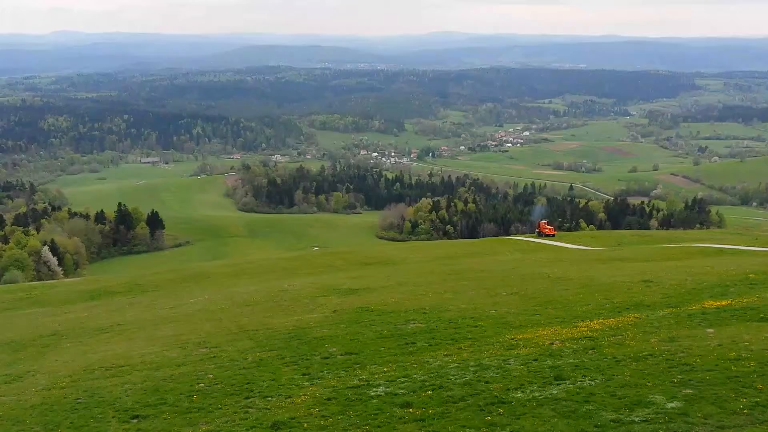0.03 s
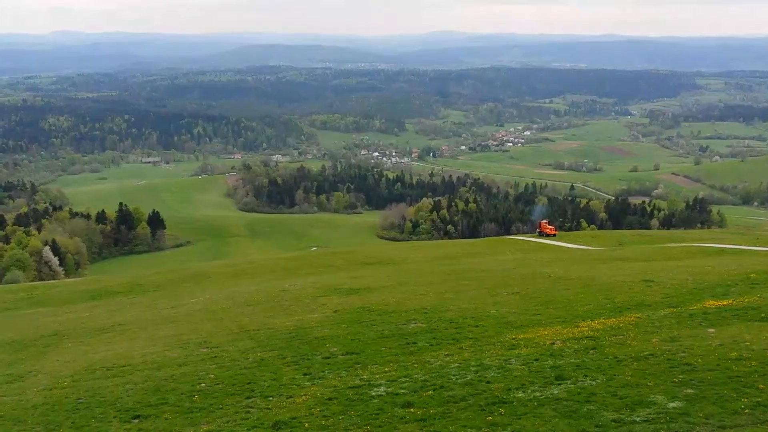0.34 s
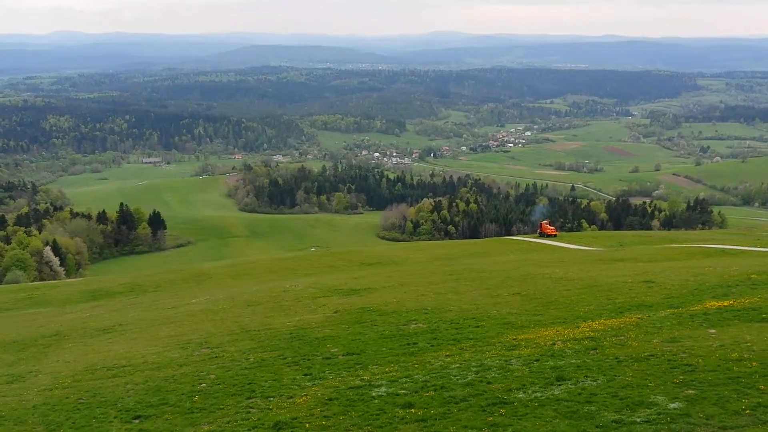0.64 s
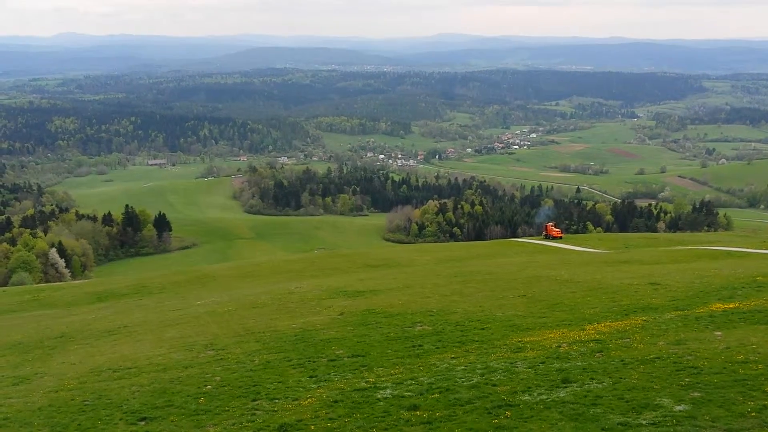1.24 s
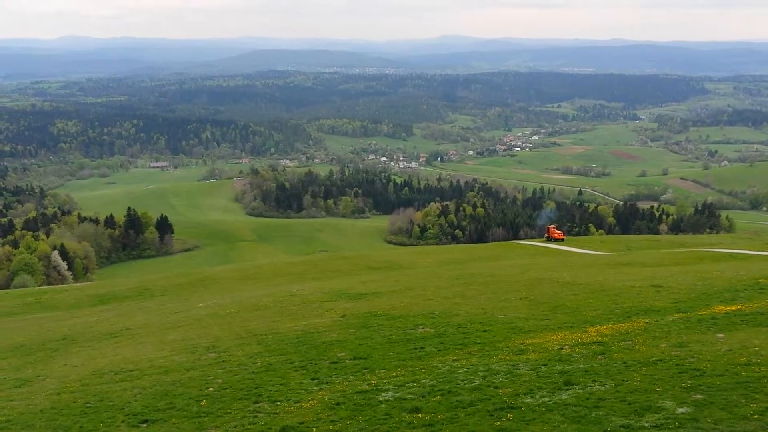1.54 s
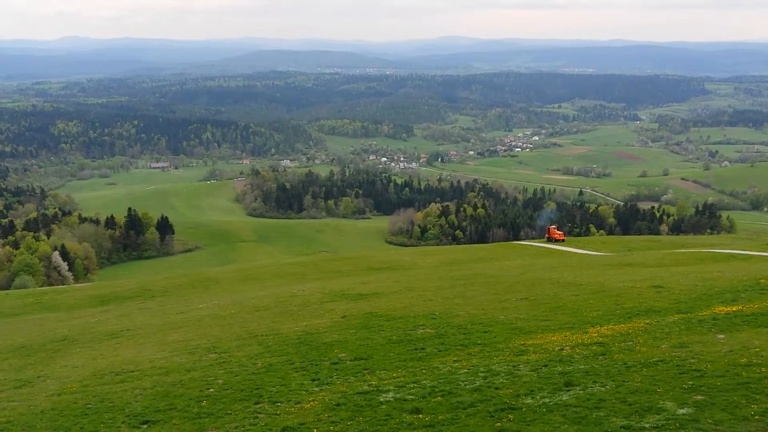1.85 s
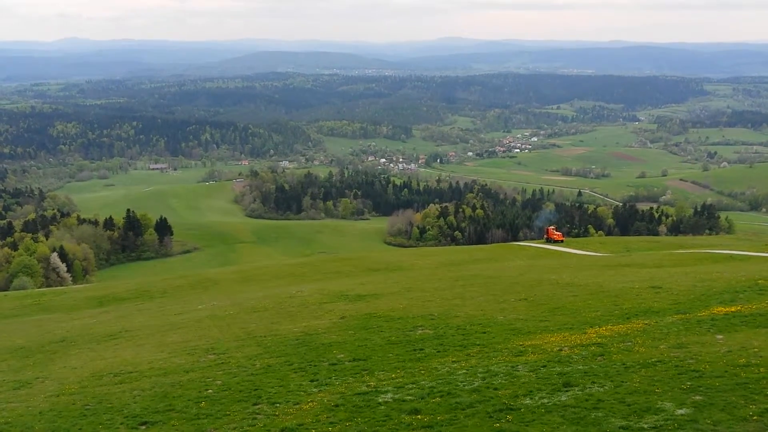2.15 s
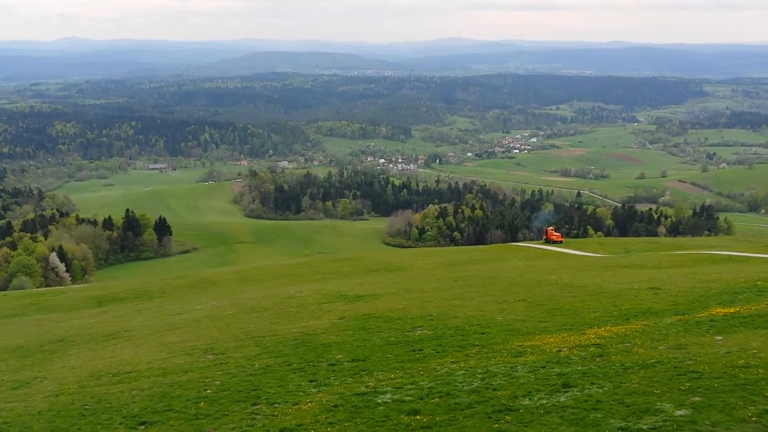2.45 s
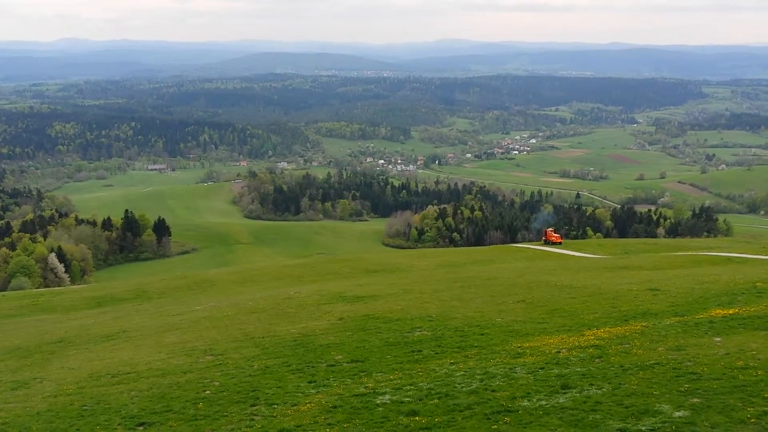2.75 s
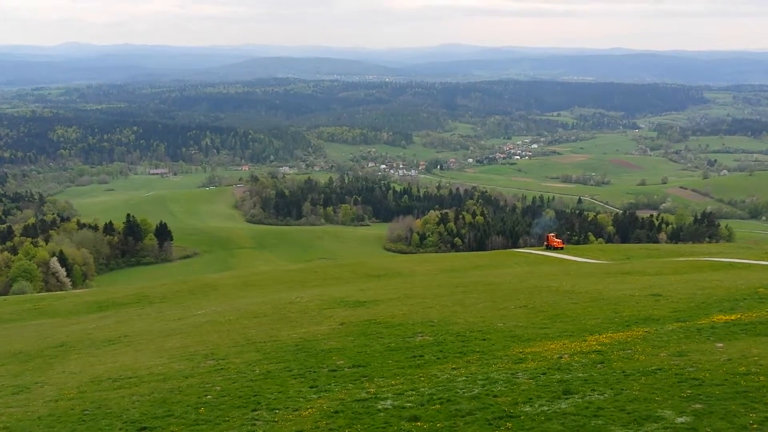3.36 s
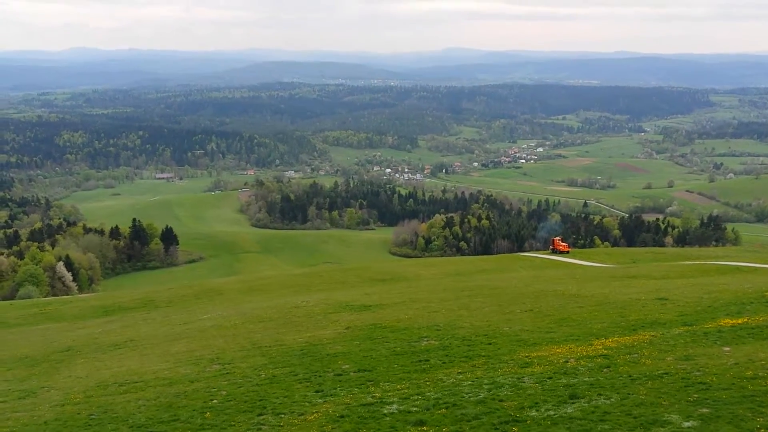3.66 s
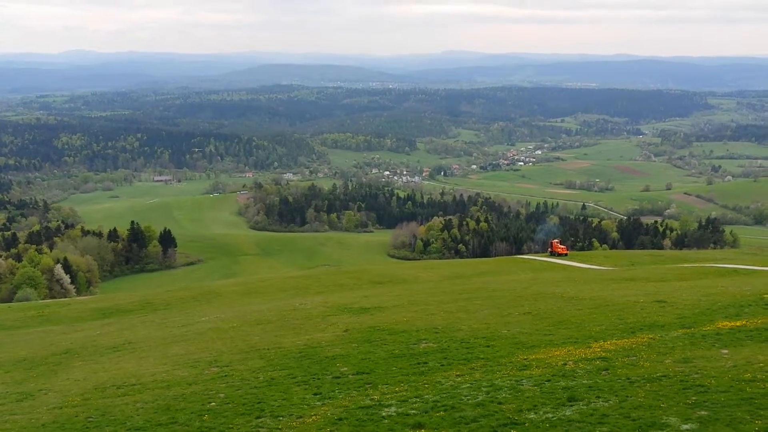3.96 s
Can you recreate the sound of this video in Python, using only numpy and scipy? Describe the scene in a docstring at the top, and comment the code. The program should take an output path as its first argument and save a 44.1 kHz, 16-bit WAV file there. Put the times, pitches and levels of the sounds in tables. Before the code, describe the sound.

A distant diesel machine, probably a winch, drones and rattles evenly across an open field, with a faint wavering whine and thin hiss. Low wind thumps hit the microphone now and then, thickening near the end.

```python
"""After a short silence, a diesel engine, probably a winch, fades in on an open hillside.
It runs at a steady speed: its knocks repeat every cycle and excite the resonances of the housing,
over a low exhaust hum, a faint gliding whine and a thin hiss. From the first second on, wind bumps
against the microphone, mostly on the right; the bumps come thickest in the last second."""
import sys
import numpy as np
from scipy import signal
from scipy.fft import rfft, irfft
from scipy.io import wavfile

SR = 44100
rng = np.random.default_rng(int(sys.argv[2]) if len(sys.argv) > 2 else 0)


def file_out(sig):
    """Save sig as 16-bit WAV at sys.argv[1]."""
    # one column per channel
    cols = np.atleast_2d(sig).T
    # limit, then scale
    lim = np.clip(cols, -1, 1)
    pcm = np.round(lim * 32767).astype(np.int16)
    wavfile.write(sys.argv[1], SR, pcm)


N = 176400
TIME, FREQS = np.arange(N) / SR, np.fft.rfftfreq(N, 1 / SR)


def engine():
    """Superposition: clatter and exhaust follow one count of engine cycles and so stay in step."""
    # Each row: time in seconds, speed in cycles per second.
    speed = [(.4, 16.22), (.85, 16.27), (1.1, 16.2), (1.4, 16.3), (1.7, 16.22), (2.1, 16.3), (2.55, 16.26),
             (2.95, 16.36), (3.35, 16.21), (4, 16.22)]
    # Each row: time in seconds, gain in dB.
    level = [(.4, 0.3), (.85, 1), (1.45, -0.8), (2.35, -0.24), (2.6, -0.86), (2.9, -0.7), (3.3, -1.5),
             (4, -2)]
    cycles = np.cumsum(in_time(speed)) / SR
    sound = shade_treble(clatter(cycles)) + exhaust(cycles)
    return from_db(in_time(level)) * at_ports(sound)


def clatter(cycles):
    """Resonance and interference: knocks ring the housing; reflections cancel narrow bands."""
    # Each row: resonance in Hz, bandwidth in Hz, left and right peak levels in dB.
    housing = [(516.6, 31, -72.5, -63), (683.7, 81, -57.5, -57.5), (761, 49, -57.5, -54.5),
               (839, 59, -58.5, -58), (916, 23.3, -53, -60), (986, 58, -56.5, -60), (1068, 71, -65, -56),
               (1110.6, 54, -53, -53), (1281.5, 70, -56.5, -60), (1398.5, 46.5, -55, -68.5),
               (1464, 42, -57, -88), (1675, 33, -60, -77), (1784, 67, -52.5, -56.5), (1878, 50, -57, -69.5),
               (2016, 140, -64.5, -61), (2104, 32, -55.5, -53), (2207, 63, -55.5, -61),
               (2466, 74, -61.5, -71.5), (2624, 172, -62.5, -68.5), (2884, 46, -61, -91),
               (3057, 83, -63.5, -82), (3350, 260, -96.5, -73), (4317, 54, -92, -68.5),
               (4602, 125, -76, -87.5)]
    # The broad spectrum beneath. Each row: frequency in Hz, left and right relative levels in dB.
    broadband = [(30, -78, -87), (107, -58, -59.5), (236, -65, -68), (435, -73.5, -73.5), (597, -67.5, -64),
                 (1000, -68, -67.5), (1920, -62.5, -63.5), (3000, -76.5, -74.5), (3890, -72, -73.5),
                 (4950, -86, -77), (6450, -89.5, -86), (8560, -112, -100), (12300, -130, -120)]
    # Each row: frequency of a cancellation in Hz, gain at its centre in dB.
    dips = [(790, -9), (893, -8), (1190, -7), (1398, -6), (1650, -6), (1945, -5.5)]
    broadband_db, dip_width_hz = -1.13, 5.8
    force = knocking(cycles)
    drives = [rattle(cycles, force) for _ in range(4)]
    spectrum = drives[-1] * from_db(over_hz(broadband) + broadband_db)
    for k, (hz, width, left_db, right_db) in enumerate(housing):
        detune = 2 * (FREQS - hz) / width
        response = 1 / (1 + 1j * np.sqrt(2) * detune - detune ** 2)
        spectrum += drives[k % 3] * response * from_db([[left_db], [right_db]])
    dips_db = sum(db * bell(FREQS - hz, dip_width_hz) for hz, db in dips)
    return irfft(spectrum * from_db(dips_db), N)


def knocking(cycles):
    """Impact excitation: the force of each knock jumps, then decays exponentially to a steady floor."""
    # Each row: position as a fraction of the cycle, relative level in dB.
    knocks = [(.09, -5), (.2, 8.5), (.27, 3), (0.478, -0.5), (.59, -2.5), (0.669, 8.5), (0.792, 2),
              (0.872, 6), (.92, 3.5)]
    decay_s, scatter_db, floor_db = 0.0015, 2.5, 4
    power = np.zeros(N)
    for position, db in knocks:
        onsets = np.searchsorted(cycles, np.arange(int(cycles[-1]) + 1) + position)
        onsets = onsets[onsets < N]
        scatter = scatter_db * rng.standard_normal(100)[:len(onsets)]
        power[onsets] += from_db(db + scatter) ** 2
    power = signal.lfilter([1], [1, -np.exp(-2 / (decay_s * SR))], power)
    return unit_rms(np.sqrt(power + from_db(floor_db) ** 2))


def rattle(cycles, force):
    """Periodicity: in the knocks' stereo spectrum, repeated noise gives partials, fresh noise a floor."""
    # Each row: frequency in Hz, fraction of power common to left and right.
    likeness = [(100, .5), (380, .5), (520, .88), (720, .98), (1100, .94), (2000, .85), (3000, .6),
                (4000, .75), (5500, .3), (9000, .05)]
    cycle_hz, repeat_share, flicker_db = 16.26, 0.53, 0.92
    period = int(SR / cycle_hz)
    place_in_cycle = (cycles % 1 * period).astype(int)
    first, second = rng.standard_normal((2, 3, period))[:, :, place_in_cycle]
    blend = 0.68 * drift(rate_hz=1.18)  # moving air slowly shifts strength among the partials
    repeated = np.cos(blend) * first + np.sin(blend) * second
    fresh = rng.standard_normal((3, N))
    grain = np.sqrt(repeat_share) * repeated + np.sqrt(1 - repeat_share) * fresh
    spectra = rfft(grain * force * from_db(flicker_db * drift(rate_hz=5.1)))
    common, separate = spectra[0], spectra[1:]
    alike = over_hz(likeness)
    return np.sqrt(SR / 2) * (np.sqrt(alike) * common + np.sqrt(1 - alike) * separate)


def shade_treble(sound, corner_hz=3500):
    """Shelving filter: the gain above the corner falls, so the clatter slowly grows duller."""
    # Each row: time in seconds, treble gain in dB.
    level = [(.4, 1.5), (.9, 1.5), (1.6, -0.2), (4, -0.7)]
    high_pass = 1 - 1 / (1 + (FREQS / corner_hz) ** 10)
    treble = irfft(rfft(sound) * high_pass, N)
    return sound + (from_db(in_time(level)) - 1) * treble


def exhaust(cycles):
    """Harmonics of the firing cycle: low orders hum and waver; high ones drone with jittering phase."""
    # Each entry: frequency as a multiple of the cycle rate.
    orders = [6, 7, 8, 9, 41, 43, 51, 57, 61, 66, 70, 71, 78, 79, 89, 103, 108]
    # Each row, one per order: left and right relative levels in dB.
    levels = [(-41.5, -39.5), (-52, -50), (-52, -48), (-44, -42.5), (-50, -49), (-45, -43), (-48, -48),
              (-41.5, -44), (-43, -43), (-45, -44), (-45, -45), (-44, -41.5), (-40, -43), (-45, -46),
              (-48, -62), (-48, -59), (-43.5, -46)]
    gain_db, hum_waver_db, drone_waver_db, jitter_rad = -1, 3, 0.5, 0.24
    tones = np.zeros((2, N))
    for order, stereo_db in zip(orders, levels):
        is_drone = order > 10
        waver_db = (drone_waver_db if is_drone else hum_waver_db) * drift(rate_hz=8.7)
        gain = from_db(gain_db + np.array(stereo_db)[:, None] + waver_db)
        phase = 2 * np.pi * (order * cycles + rng.random())
        jitter = is_drone * jitter_rad * drift(rate_hz=4.2)
        tones += gain * np.sqrt(2) * np.sin(phase + jitter)
    return tones


def at_ports(sound):
    """Phase shift: the engine reaches the two microphone ports out of step."""
    # Each row: frequency in Hz, phase lead of the left side in radians (negative is a lag).
    left_lead = [(100, -.1), (900, -.05), (1050, -1), (1170, -.9), (1230, .1), (1330, -.5), (1400, -1.7),
                 (1500, -4), (1700, -7.5), (1950, -9.2), (2020, -7.3), (2100, -9.4), (2250, -9.8),
                 (2550, -13.6), (2750, -15), (2950, -13), (3700, -13), (3820, -16.3), (4050, -18.8),
                 (5200, -21)]
    left, right = sound
    shift = np.exp(1j * over_hz(left_lead)[0])
    return np.array([irfft(rfft(left) * shift, N), right])


def wind():
    """Turbulence at the ports: a lumpy rumble, pressure swings wrapped in eddies, and brighter buffets."""
    # Each row: centre of a bump in seconds, relative peak level in dB, pitch in Hz.
    bumps = [(.638, -20, 170), (.651, -18, 130), (.681, -19, 150), (1.055, -6.5, 140), (1.083, -7.5, 140),
             (1.2, -14, 145), (1.285, -18, 95), (1.371, -18, 100), (1.709, -13, 130), (1.809, -13.5, 100),
             (2.08, -13, 100), (2.104, -14, 120), (2.157, -19.5, 135), (2.761, -17, 160), (2.928, -17, 105),
             (2.987, -19, 115), (3.262, -17, 210), (3.276, -12.5, 120), (3.36, -17, 110), (3.398, -14, 180),
             (3.413, -6.5, 105), (3.438, -15, 135), (3.478, -15, 115), (3.548, -16, 125), (3.568, -8, 105),
             (3.661, -8, 185), (3.73, -18, 125), (3.777, -11.5, 140), (3.809, -8.5, 230),
             (3.828, -10.5, 135), (3.887, -9.5, 160), (3.922, -10.5, 105), (3.947, -14, 110)]
    # Each row: centre of a buffet in seconds, eddy level in dB, half length in seconds, rush level in dB.
    buffets = [(.67, -29.5, 0.055, -55), (2.102, -28, 0.029, -52), (2.778, -25.5, .025, -45),
               (3.283, -25, .015, -36), (3.43, -25, 0.028, -43), (3.803, -24, 0.018, -24.5),
               (3.93, -24, 0.019, -35)]
    # Each row: time in seconds, rumble level in dB.
    rumble_level = [(.4, -50), (.65, -35), (.85, -41), (1.2, -33), (1.6, -33.5), (2.1, -41.5),
                    (2.35, -42.5), (2.7, -30.5), (3.1, -35.5), (3.4, -31), (3.85, -30.5), (4, -44)]
    # Three noise spectra. Each row: frequency in Hz, relative level in dB.
    rumble_colour = [(18, -20), (30, -6.5), (60, -1), (110, -2.5), (170, -7.5), (260, -14), (400, -22.5),
                     (700, -45.5), (2000, -94)]
    eddy_colour = [(30, -11), (80, 0.5), (160, 2), (280, -6.5), (430, -14), (1000, -40), (2500, -76)]
    rush_colour = [(100, -10), (220, -4), (550, 3), (900, -16), (3000, -70)]
    swing_db, eddy_db, eddy_half_s = 0.5, -19, 0.014
    lumps_db, left_db, low_cut_hz = 5, -23.5, 43
    swings, eddies, rush = np.zeros((3, N))
    for centre, db, hz in bumps:
        spread = np.minimum((np.pi * hz * (TIME - centre)) ** 2, 20)
        swings += from_db(db + swing_db) * (1 - 2 * spread) * np.exp(-spread)  # Ricker pulse
        eddies += from_db(db + eddy_db) * bell(TIME - centre, eddy_half_s)
    for centre, db, half_length, rush_db in buffets:
        swell = bell(TIME - centre, half_length)
        eddies = np.hypot(eddies, from_db(db) * swell)  # powers add
        rush += from_db(rush_db) * swell
    rumble = from_db(in_time(rumble_level) + lumps_db * drift(rate_hz=7.6))
    layers = [(rumble, rumble_colour), (eddies, eddy_colour), (rush, rush_colour)]
    left, right = (sum(gain * coloured(colour) for gain, colour in layers) for _ in range(2))
    low_cut = signal.butter(2, low_cut_hz, "high", fs=SR, output="sos")
    return signal.sosfilt(low_cut, [from_db(left_db) * left, right + swings])


def whine():
    """Frequency and amplitude modulation: a faint tone, perhaps a fan or a pump, glides and wavers."""
    # Each row: time in seconds, pitch in Hz.
    pitch = [(.4, 439.6), (1.1, 444), (1.7, 460), (2.25, 450), (3, 458.5), (3.45, 452), (4, 438)]
    # Each row: time in seconds, gain in dB.
    level = [(.4, -13), (1.4, 1.6), (3, 2), (4, 0.5)]
    stereo_db, waver_db, pitch_wander = np.array([[-51.5], [-48.5]]), 3, 0.0031
    hz = in_time(pitch) * (1 + pitch_wander * drift(rate_hz=2.65))
    gain = from_db(stereo_db + in_time(level) + waver_db * drift(rate_hz=5.9))
    return gain * np.sqrt(2) * np.sin(2 * np.pi * np.cumsum(hz) / SR)


def hiss(left_db=-45, right_db=5.5):
    """Amplitude-modulated noise: a faint high hiss swells and sinks on the right."""
    # Each row: time in seconds, relative level in dB.
    level = [(0.67, -62.5), (0.79, -66.5), (1.01, -56), (1.09, -65), (1.85, -61.5), (1.95, -58),
             (2.06, -64.5), (2.78, -64.5), (3.0, -56.5), (3.28, -63), (3.44, -56), (3.82, -62.5),
             (4.0, -59.5)]
    # Each row: frequency in Hz, relative level in dB.
    colour = [(3000, -29.5), (6000, -3), (8000, 5.5), (9500, 3), (11000, -10), (13000, -35)]
    return np.array([from_db(db + in_time(level)) * coloured(colour) for db in (left_db, right_db)])


def coloured(colour):
    """Spectral shaping: white noise takes on the given spectrum, at unit rms."""
    white = rfft(rng.standard_normal(N))
    return unit_rms(irfft(white * from_db(over_hz(colour)[0]), N))


def drift(rate_hz):
    """Low-pass noise: a slow random fluctuation of unit rms."""
    hz = FREQS[:800]
    real, imaginary = rng.standard_normal((2, len(hz)))
    spectrum = (real + 1j * imaginary) * (hz > 0) / (1 + (hz / rate_hz) ** 2)
    return unit_rms(irfft(spectrum, N))


def bell(offset, half_width):
    """Gaussian curve: 1 at the centre, 1/e at one half width from it."""
    return np.exp(-np.minimum((offset / half_width) ** 2, 20))


def in_time(rows):
    """Linear interpolation of a curve at every sample."""
    return np.interp(TIME, *np.transpose(rows))


def over_hz(rows):
    """Interpolation of each column along a logarithmic frequency axis."""
    hz, *columns = np.transpose(rows)
    return np.array([np.interp(np.log(FREQS + 1), np.log(hz), column) for column in columns])


def from_db(db):
    """Amplitude ratio of a level in decibels."""
    return 10 ** (np.asarray(db) / 20)


def unit_rms(x):
    """Normalisation to unit mean power."""
    return x / np.sqrt(np.mean(x ** 2) + 1e-20)


def scene():
    """Superposition: the pressures of engine, whine, wind and hiss add."""
    return engine() + whine() + wind() + hiss()


def record(dry):
    """Gating and band limiting: silence, then a quick fade-in, with the highest treble cut off."""
    start_s, fade_s, start_gain, cutoff_hz = 0.389, 0.29, from_db(-26.5), 14200
    rise = np.clip((TIME - start_s) / fade_s, 0, 1) ** 0.98
    fade = (TIME > start_s) * (start_gain + (1 - start_gain) * rise)
    low_pass = signal.cheby2(12, 70, cutoff_hz, fs=SR, output="sos")
    return signal.sosfilt(low_pass, dry * fade + 1e-18)


dry = scene()
out = record(dry)
file_out(out)
```